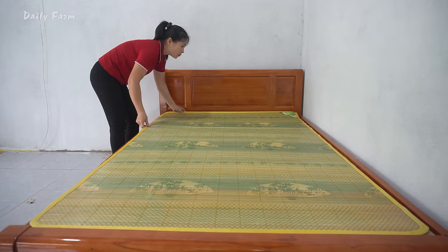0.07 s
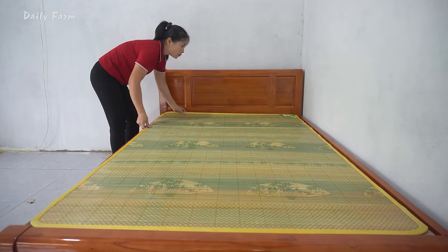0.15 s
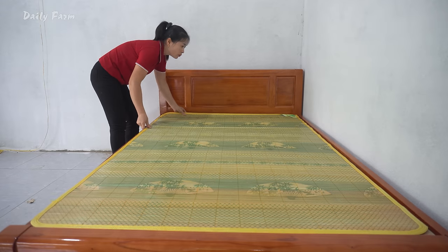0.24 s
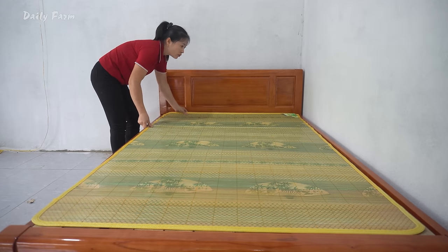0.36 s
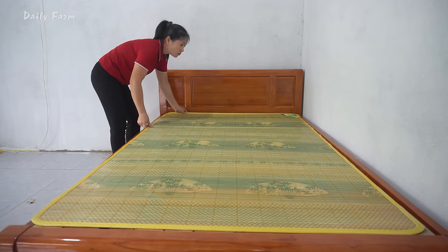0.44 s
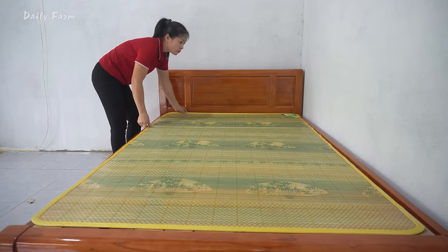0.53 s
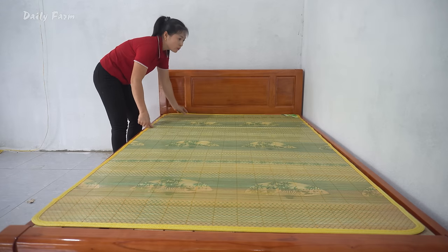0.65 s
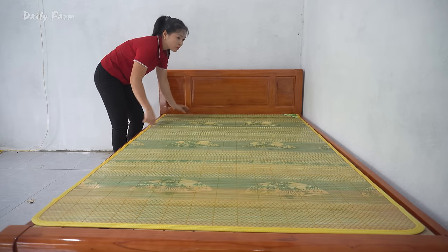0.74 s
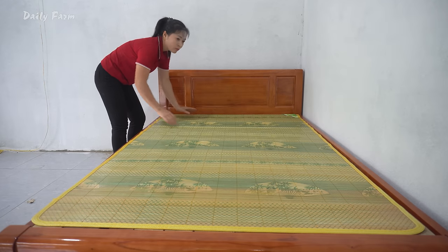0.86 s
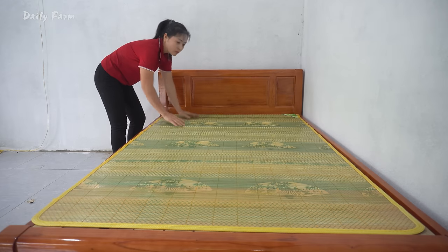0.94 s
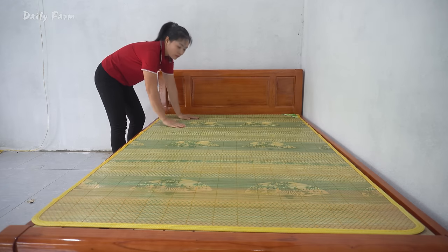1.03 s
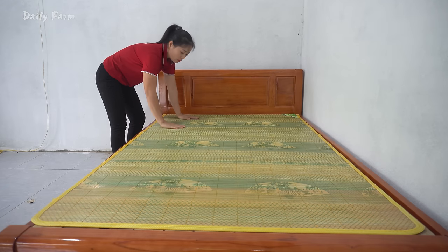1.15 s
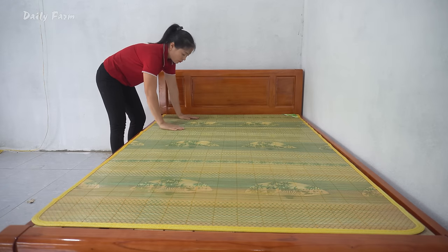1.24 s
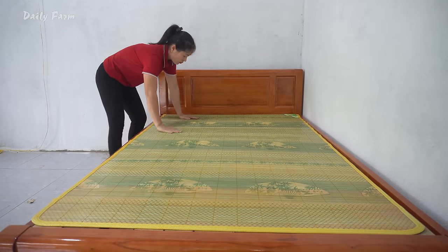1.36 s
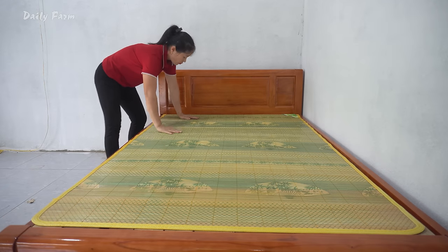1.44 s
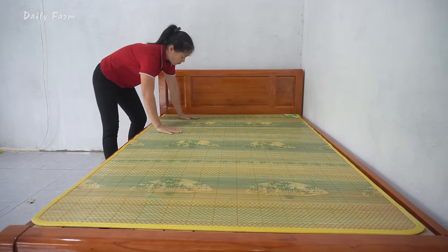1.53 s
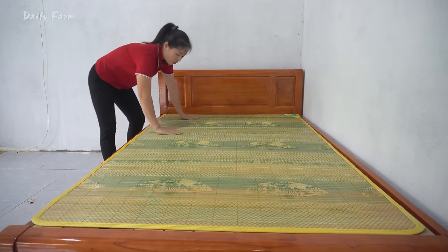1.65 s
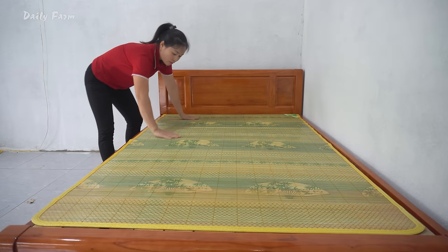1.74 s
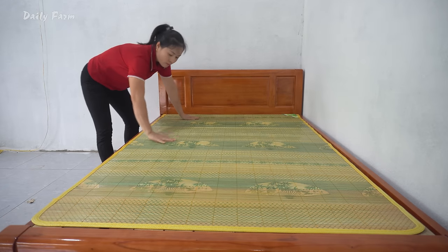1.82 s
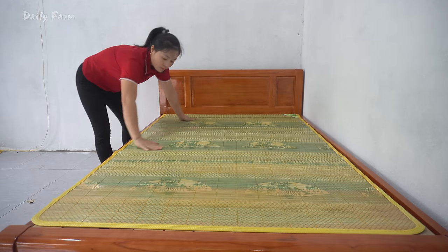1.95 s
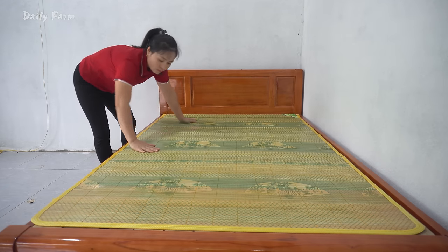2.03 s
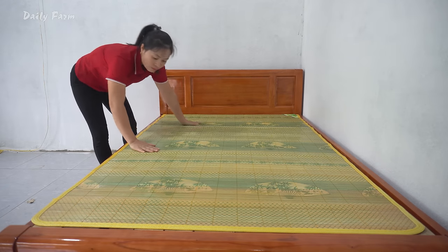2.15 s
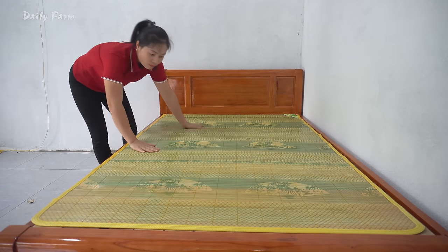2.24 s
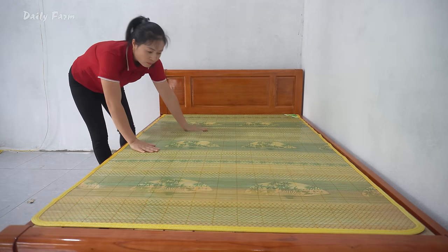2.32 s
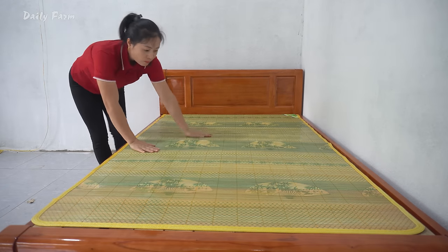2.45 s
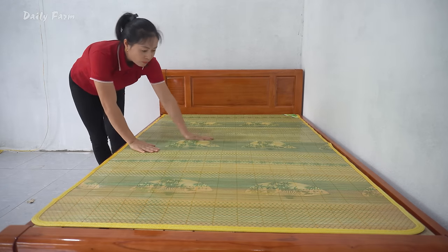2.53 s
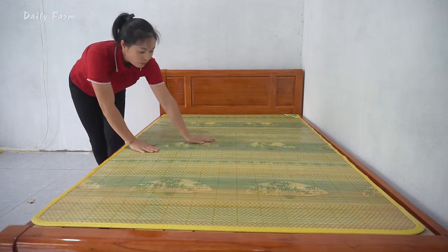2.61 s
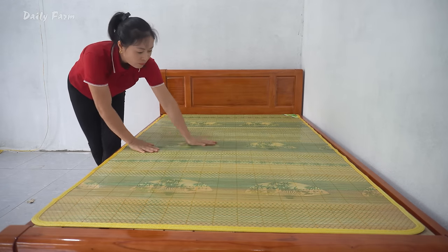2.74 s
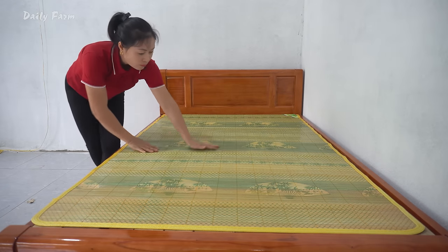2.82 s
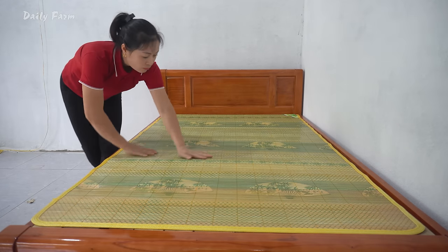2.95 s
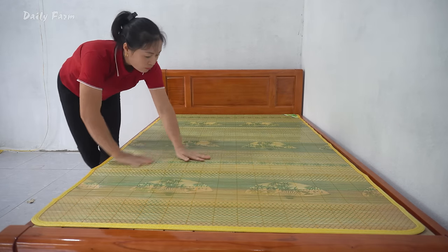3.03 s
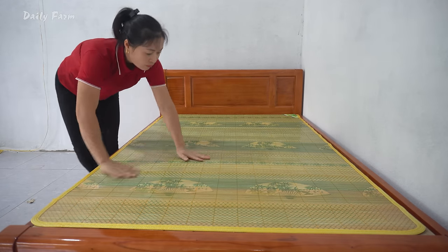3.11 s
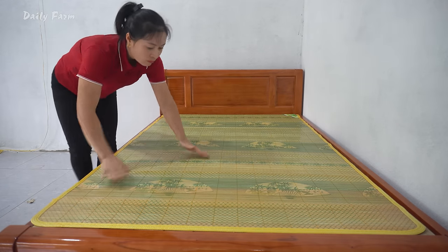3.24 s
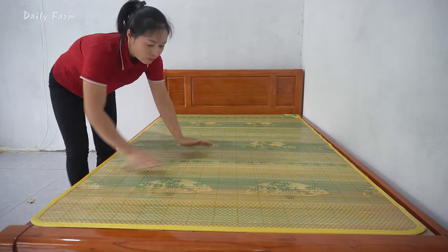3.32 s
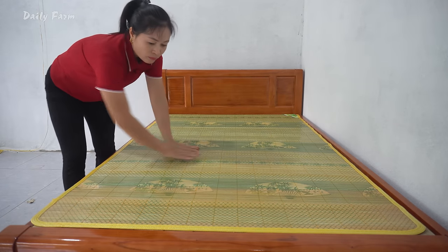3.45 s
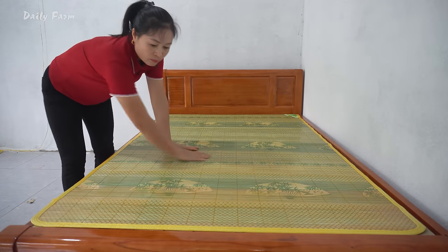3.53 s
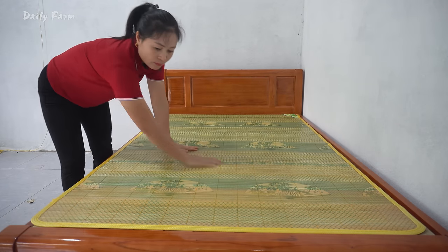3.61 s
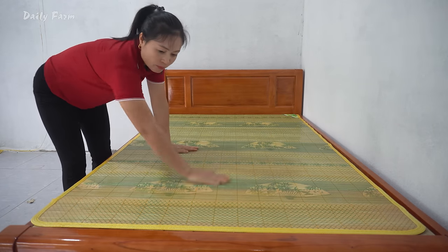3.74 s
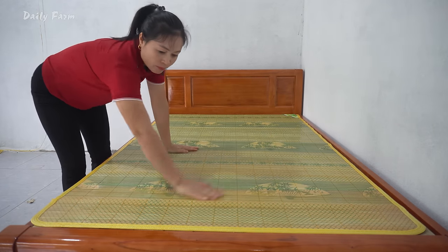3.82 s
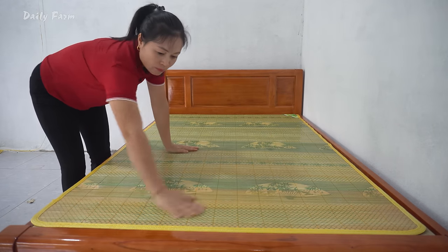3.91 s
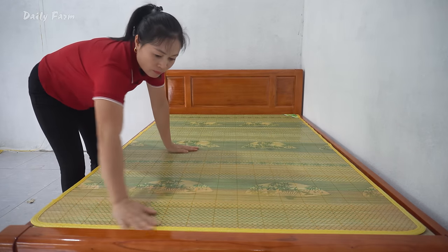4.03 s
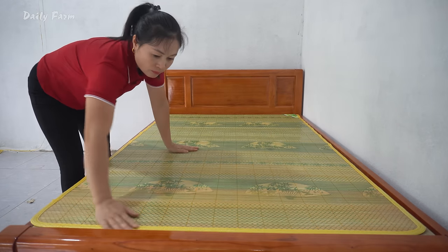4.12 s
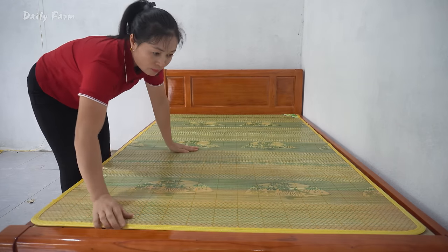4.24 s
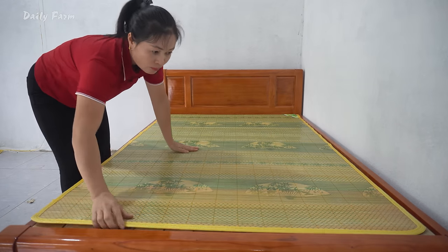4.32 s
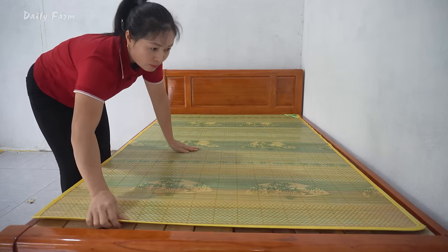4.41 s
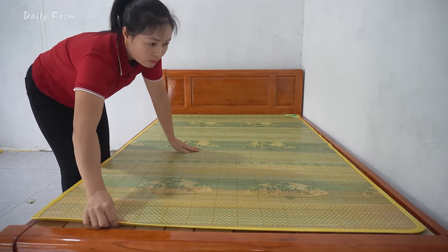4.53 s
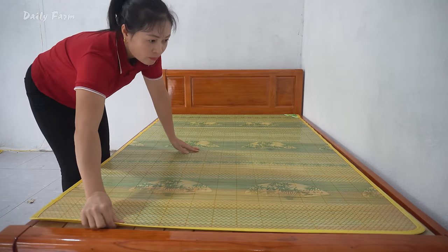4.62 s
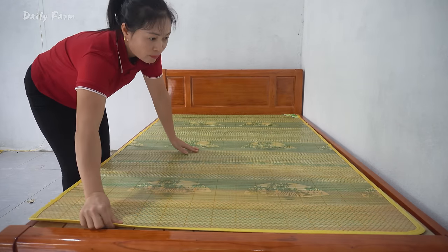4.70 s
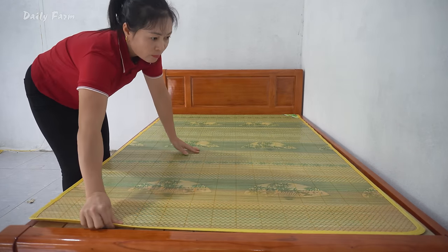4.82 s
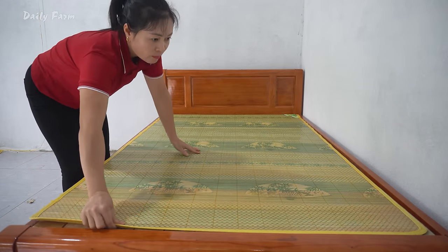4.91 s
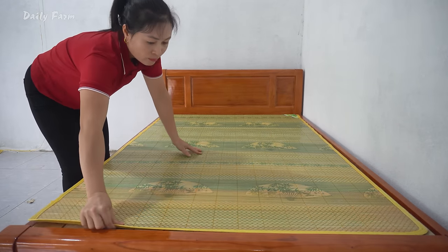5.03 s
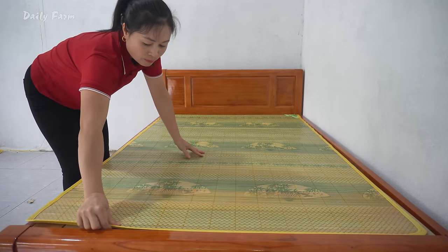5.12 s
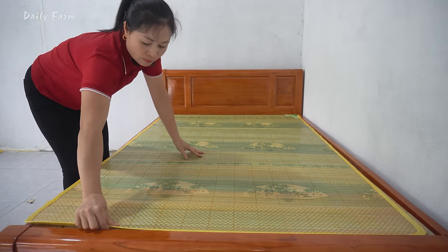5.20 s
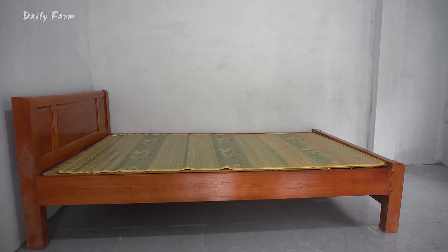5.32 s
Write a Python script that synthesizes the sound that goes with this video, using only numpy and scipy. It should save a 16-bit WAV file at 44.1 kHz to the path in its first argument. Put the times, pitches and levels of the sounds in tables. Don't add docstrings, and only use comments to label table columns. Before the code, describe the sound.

Close stereo sound of palms on a stiff woven mat over bed boards. It opens with sharp slat knocks and rattling strips, thins out, then becomes continuous hissing and rasping strokes, with muffled wooden bumps and small fibre clicks. The strongest sweep comes just before four seconds; the end is quiet handling with faint ticks, in a bare room with soft air murmur.

```python
import sys
import numpy as np
from scipy import signal
from scipy.fft import rfft, irfft, next_fast_len
from scipy.io import wavfile

SR = 44100
rng = np.random.default_rng(int(sys.argv[2]) if len(sys.argv) > 2 else 0)


def digitize_waveform(pressure):
    field = np.atleast_2d(pressure).T
    bounded = np.clip(field, -1, 1)
    quanta = np.round(bounded * 32767).astype(np.int16)
    wavfile.write(sys.argv[1], SR, quanta)


def amplitude_ratio(level_db):
    exponent = np.asarray(level_db, float) / 20
    return 10 ** exponent


N = 236596

# start_s, speed_up_s, slow_down_s, hiss_db, tips_db
GLIDES = [(.0, .05, 0.14, -48, -12), (.45, 0.089, 0.25, -44, -24), (.74, 0.11, 0.087, -53, -4),
          (1.55, .1, 0.18, -55.5, -16), (1.41, 0.29, 0.18, -40, 0.5), (1.9, 0.28, 0.36, -36.5, 0.5),
          (2.07, 0.24, 0.15, -40.5, 11), (2.4, 0.41, 0.27, -36.5, 0.5), (2.63, 0.33, 0.12, -38, 4),
          (3.0, 0.43, 0.43, -37.5, 1), (3.2, 0.23, 0.17, -33, 5.5), (3.3, .1, 0.18, -45, -6),
          (3.58, 0.071, 0.088, -62, 24), (3.8, .2, .3, -31.5, 0.5), (3.92, 0.1, 0.34, -32.5, 4.5),
          (4.1, 0.31, 0.27, -40.5, 2.5), (4.47, 0.041, 0.14, -51, 2), (4.65, .4, 0.72, -54.5, -2),
          (4.985, 0.051, 0.17, -50.5, 2), (5.2, 0.14, 0.22, -45.5, 1), (5.28, 0.11, 0.14, -53, -10)]
# start_s, rasp_db, fade_60db_s, skin_db, board_db
LANDINGS = [(0.058, -38.5, 1.5, -41, -53), (.309, -45.5, 0.91, -49, -52.5),
            (0.364, -32.5, 0.76, -32.5, -46), (.379, -30, 0.93, -30.5, -42),
            (0.777, -39.5, 0.71, -58, -38.5), (1.051, -41.5, 0.85, -71, -38.5), (2.417, -39, 1.6, -44, -41),
            (2.835, -41.5, 2.2, -58, -43.5), (3.51, -52, 0.74, -56, -48.5), (3.586, -49.5, 0.76, -66, -45),
            (4.955, -51.5, 2.2, -63, -60)]
# start_s, press_s, release_s, rasp_db, board_db
LEANS = [(.0, .05, 0.088, -45.5, -49), (.23, .15, 0.058, -49, -46.5), (.44, .1, 0.18, -41, -39),
         (.7, .15, .12, -50.5, -49), (.765, 0.047, 0.045, -55, -49), (1.415, 0.28, 0.18, -45.5, -49),
         (1.9, 0.21, 0.26, -41, -44.5), (2.07, 0.24, 0.13, -38, -42), (2.27, 0.33, 0.3, -43.5, -46),
         (2.52, 0.063, 0.16, -48, -44.5), (2.63, .15, 0.36, -42.5, -63), (3.0, 0.24, 0.18, -42, -43),
         (3.15, 0.13, 0.17, -41, -41.5), (3.24, 0.15, 0.17, -48, -39.5), (3.79, 0.088, 0.42, -38.5, -38),
         (4.03, 0.31, .12, -57, -48), (4.2, 0.068, 0.3, -47, -62), (4.34, 0.27, 0.15, -47, -54.5),
         (4.79, 0.14, 0.2, -51.5, -58.5), (5.04, 0.11, 0.15, -47.5, -53.5), (5.24, 0.14, 0.18, -42.5, -45)]
# pitch_hz, level_db
SKIN_COLOUR = [(2500, -14), (5000, -6), (7400, -4), (10000, -2), (13500, 0.5), (15000, -1.5), (16500, -6.5)]
# pitch_hz, level_db
SLAT_COLOUR = [(400, -15.5), (800, -7.5), (1300, -5.5), (2100, 2), (2900, -1), (4300, -2.5), (6500, -10),
               (11000, -19)]
# pitch_hz, width_hz, level_db
BOARD_MODES = [(192, 57, 0), (220, 28, 4), (250, 27, -0.5), (308, 45, -2.5), (363.3, 17.2, 0),
               (420, 32, -4), (517, 79, -5.5), (700, 160, -12)]
# pitch_hz, width_hz, level_db
FRAME_MODES = [(50.6, 15, -0.5), (77, 16.5, 5), (99, 33, -0.5)]
# start_s, fade_60db_s, pitch_hz, width_hz, peak_db
RUSTLES = [(.001, 0.62, 4100, 700, -52.5), (.004, 0.34, 799.2, 292, -49), (.062, 0.63, 4150, 833.3, -42),
           (.066, 0.48, 597, 300, -45), (0.317, 0.32, 5660, 1500, -48), (.372, 0.48, 2120, 250, -40.5),
           (.376, 0.51, 1080, 298, -37), (.44, 0.19, 3500, 4020, -35), (0.668, 0.26, 3920, 594, -48),
           (1.062, 0.74, 916.7, 648, -42), (3.188, 0.52, 396, 140, -42), (4.29, .6, 1500, 700, -49.5),
           (4.445, 0.32, 14200, 2500, -46), (5.17, 0.58, 2140, 700, -45)]
# pitch_hz, level_db
AIR_COLOUR = [(24, -30), (40, 5.5), (190, 2.5), (831, -4), (2050, -4), (6820, -15.5), (13100, -24.5),
              (16000, -31)]
# pitch_hz, fade_60db_s
ROOM_FADE = [(100, 1), (500, 0.5), (2000, 0.58), (6000, 0.45), (14000, 0.22)]
# start_s, slat_peak_db, slat_pitch_hz, ring_s, tick_db
PATS = [(0.0612, -14.5, 1800, 0.00079, -33), (.063, -17, 1300, .0008, -25), (0.312, -33, 2000, .001, -41),
        (.3662, -16.5, 2180, 0.0031, -22), (0.3813, -15, 2150, 0.0027, -42),
        (0.382, -26, 2240, 0.0023, -31), (0.7778, -15, 2460, 0.0017, -48), (1.054, -24, 2240, 0.0027, -52),
        (1.056, -30.5, 2830, 0.0029, -56), (2.837, -21, 2300, 0.00087, -22.5),
        (4.6008, -48, 2350, 0.0008, -31), (4.9571, -48, 2300, .001, -42), (4.9775, -44, 2500, .001, -40)]
# start_s, peak_db, pitch_hz, ring_s
SNAPS = [(0.0618, -22, 6900, 0.00015), (0.0634, -27, 9100, 0.00019), (.3126, -45, 11500, 0.00056),
         (.3807, -14, 5060, 0.00015), (0.385, -19, 3200, 0.00094), (0.395, -19, 4000, 0.00018),
         (.4412, -20, 12500, .0006), (.79, -30, 5200, 0.00033), (2.431, -23.5, 2280, .0006),
         (2.512, -28, 2000, 0.0019), (4.601, -35, 13000, .001), (4.9645, -38, 14500, .0007),
         (4.9762, -37, 15000, .0007)]
# start_s, swell_s, first_pitch_hz, last_pitch_hz, peak_db
HUMS = [(.42, 0.073, 238, 244.6, -35.5), (.43, 0.048, 201.9, 192, -43), (.73, 0.045, 289, 287, -45.5),
        (.80, 0.045, 190.2, 202, -44.5), (1.055, 0.009, 85.8, 72.4, -44),
        (1.058, 0.015, 250.5, 257.7, -34.5), (1.08, 0.02, 209, 200, -50), (1.80, 0.064, 85.9, 79.5, -44.5),
        (1.93, 0.041, 196, 168.3, -42.5), (2.03, 0.033, 280, 302, -53), (2.25, 0.024, 250, 250, -51.5),
        (2.42, 0.042, 80, 89.4, -53), (2.46, 0.033, 187.5, 195, -45.5), (2.85, 0.02, 420, 420, -46),
        (3.01, 0.052, 252.7, 274.4, -40), (3.02, 0.053, 208.7, 237, -42.5), (3.18, 0.046, 88.2, 84, -44),
        (3.19, 0.033, 225.2, 228.3, -41), (3.585, 0.013, 93.4, 87, -39), (3.72, 0.037, 134, 151, -47),
        (3.76, 0.054, 155, 199, -41.5), (3.84, 0.042, 236.2, 220, -42), (4.29, 0.046, 367, 363, -55.5),
        (5.19, 0.038, 193.3, 213, -49)]
# pitch_hz, level_db
MAT_WIDTH = [(50, -30), (125, -28), (250, -22), (500, -14.5), (1000, -11), (2000, -8), (4000, -2.5),
             (8000, -.5), (13000, -4)]
# pitch_hz, level_db
AIR_WIDTH = [(60, -14.5), (300, -2), (1000, 2), (2500, -4), (8000, -2)]
# pitch_hz, level_db
PORT_DIFFERENCE = [(300, -0.5), (1500, -0.8), (4000, -0.1), (8000, 0.4), (12000, -0.8), (16000, -2)]


def rms_one(x):
    return x / np.sqrt(np.mean(x ** 2) + 1e-20)


def at_hz(points, hz):
    table_hz, values = np.array(points).T
    return np.interp(np.log(hz + 1), np.log(table_hz), values)


def coloured(x, points):
    size = next_fast_len(N)
    gain = amplitude_ratio(at_hz(points, np.fft.rfftfreq(size, 1 / SR)))
    return irfft(rfft(x, size) * gain, size)[..., :N]


def tilted(x, pivot_hz, tilt_db):
    low = signal.sosfiltfilt(signal.butter(2, pivot_hz, fs=SR, output="sos"), x)
    return low * amplitude_ratio(-tilt_db / 2) + (x - low) * amplitude_ratio(tilt_db / 2)


def drift(rate_hz):
    r = np.exp(-80 * np.pi * rate_hz / SR)
    slow = signal.lfilter([1], [1, -2 * r, r * r], rng.standard_normal(N // 40 + 2002))
    slow = slow[2000:]
    return np.interp(np.arange(N) / 40, np.arange(len(slow)), rms_one(slow))


def resonate(x, modes):
    out = 0
    for k, (hz, width_hz, db) in enumerate(modes):
        r = np.exp(-np.pi * width_hz / SR)
        poles = [1, -2 * r * np.cos(2 * np.pi * hz / SR), r * r]
        out = out + (-1) ** k * amplitude_ratio(db) * signal.lfilter([1 - r * r, 0, r * r - 1], poles, x)
    return out


def slips(per_s, spread_db, bunch_db):
    sizes = amplitude_ratio(spread_db * np.minimum(rng.exponential(1, (2, N)), 5))
    signs = rng.choice([-1, 1], (2, N))
    born = rng.random((2, N)) < per_s / SR
    return sizes * signs * born * amplitude_ratio(bunch_db * drift(19.5))


def swell(s, swell_s, t60):
    t = np.clip(np.arange(N) / SR - s, 0, None)
    rise = np.sin(np.pi / 2 * np.minimum(t / swell_s, 1)) ** 2
    return t, rise * amplitude_ratio(-60 * np.maximum(t - swell_s, 0) / t60)


def motion(s, rise_s, fall_s):
    drop_db, bluntness = 19.5, 1.84
    t = np.arange(0, N + 32, 32) / SR - s
    share = np.where(t < 0, t / max(rise_s, .01), t / max(fall_s, .01))
    loss = np.abs(share) ** bluntness
    return np.interp(np.arange(N) / 32, np.arange(len(t)), amplitude_ratio(-drop_db * np.minimum(loss, 6)))


def hands():
    skin, slats, board = (np.full(N, amplitude_ratio(2 * rest_db)) for rest_db in (-73.5, -61.5, -65.5))
    tips = np.zeros(N)
    for s, rise_s, fall_s, hiss_db, tips_db in GLIDES:
        power = (amplitude_ratio(hiss_db) * motion(s, rise_s, fall_s)) ** 2
        skin = skin + power
        tips = tips + tips_db * power
        slats = slats + power * amplitude_ratio(-2 * 6)

    touch_s, board_touch_s = 0.0056, 0.015
    for s, rasp_db, t60, skin_db, board_db in LANDINGS:
        skin = skin + (amplitude_ratio(skin_db) * swell(s, touch_s, t60 * 0.64)[1]) ** 2
        slats = slats + (amplitude_ratio(rasp_db) * swell(s, touch_s, t60)[1]) ** 2
        board = board + (amplitude_ratio(board_db) * swell(s, board_touch_s, t60)[1]) ** 2

    for s, press_s, release_s, rasp_db, board_db in LEANS:
        power = motion(s, press_s, release_s) ** 2
        slats = slats + power * amplitude_ratio(2 * rasp_db)
        board = board + power * amplitude_ratio(2 * board_db)

    skin_db, slat_db, board_db = 10 * np.log10([skin, slats, board])
    stiff_db = np.clip(-3 + 0.8 * (skin_db - slat_db), -10.5, 10.5)
    return skin_db, slat_db, board_db, tips / skin, stiff_db


def sweeping():
    hiss_db, rasp_db, board_db, tips_db, stiff_db = hands()
    frame_db = -55 + 1.25 * (board_db + 44) + 3.5 * drift(10)

    hiss = rms_one(coloured(slips(16000, spread_db=2.5, bunch_db=0.1), SKIN_COLOUR))
    hiss = amplitude_ratio(hiss_db) * tilted(hiss, 8000, tips_db)

    rasp = rms_one(coloured(slips(7000, spread_db=1.5, bunch_db=0.44), SLAT_COLOUR))
    rasp = amplitude_ratio(rasp_db) * tilted(rasp, 1560, stiff_db)

    boards = rms_one(resonate(slips(2000, spread_db=2.0, bunch_db=1.85), BOARD_MODES))
    boards = amplitude_ratio(board_db - 2.0) * boards

    frame = rms_one(resonate(slips(900, spread_db=2.0, bunch_db=-0.6), FRAME_MODES))
    return hiss + rasp + boards + amplitude_ratio(frame_db) * frame


def background_murmur():
    return amplitude_ratio(-57) * rms_one(coloured(rng.standard_normal((2, N)), AIR_COLOUR))


def rustles():
    out = np.zeros((2, N))
    source = slips(5000, spread_db=3.0, bunch_db=1.0)
    for s, t60, hz, width_hz, peak_db in RUSTLES:
        strip = [(hz, width_hz, 0)]
        ringing = rms_one(resonate(resonate(source, strip), strip))
        level = swell(s, 0.0086, t60)[1]
        out += amplitude_ratio(peak_db) * level * ringing
    return out


def room(x):
    t = np.arange(SR) / SR
    edges = np.geomspace(40, 18000, 9)
    white, tail = rng.standard_normal((2, SR)), 0
    for low, high in zip(edges, edges[1:]):
        band = signal.sosfilt(signal.butter(2, [low, high], "band", fs=SR, output="sos"), white)
        t60 = np.clip(at_hz(ROOM_FADE, np.sqrt(low * high)), .1, 3)
        tail = tail + band * amplitude_ratio(-60 * t / t60)
    tail = tail * np.clip((t - .006) / 0.0093, 0, 1)
    tail = tail / np.sqrt(np.sum(tail ** 2) / 2)
    return signal.fftconvolve(x[None], tail, axes=1)[:, :N]


def pats():
    out, t = np.zeros(N), np.arange(1300) / SR
    noise = rng.standard_normal((len(PATS), 2, len(t)))
    treble = signal.butter(4, 10500, "high", fs=SR, output="sos")
    rise = 1 - np.exp(-t / .0006)
    for (s, slat_db, hz, ring_s, tick_db), (slat_noise, tick_noise) in zip(PATS, noise):
        ring_s = max(ring_s, .0004)
        clatter = np.clip(0.00047 / ring_s, 0, 1)
        rough = rms_one(resonate(slat_noise, [(hz, 1200, 0)]))
        tone = np.sin(2 * np.pi * hz * t)
        slat = ((1 - clatter) * tone + clatter * rough) * np.exp(-t / ring_s)
        tick = signal.sosfilt(treble, tick_noise) * np.exp(-t / 0.0014)
        at = round(s * SR)
        out[at:at + len(t)] += rise * (amplitude_ratio(slat_db - 4.0) * slat + amplitude_ratio(tick_db + 2) * tick)
    return out


def snaps():
    out, t = np.zeros(N), np.arange(300) / SR
    for s, peak_db, hz, ring_s in SNAPS:
        click = np.sin(2 * np.pi * hz * t) * np.exp(-t / max(ring_s, .0001))
        at = round(s * SR)
        out[at:at + len(t)] += amplitude_ratio(peak_db + 1.5) * click
    return out


def hums():
    out = np.zeros(N)
    for s, swell_s, first_hz, last_hz, peak_db in HUMS:
        t, level = swell(s, swell_s, 0.2 + 6.4 * swell_s)
        hz = last_hz + (first_hz - last_hz) * np.exp(-t / swell_s / 2.03)
        out += amplitude_ratio(peak_db) * level * np.sin(2 * np.pi * np.cumsum(hz) / SR)
    return out * amplitude_ratio(3.95 * drift(15))


def left_right(front_side, width):
    front = front_side[0]
    side = coloured(front_side[1], width)
    return np.array([front + side, front - side])


def scene():
    sweep = sweeping()
    air = background_murmur()
    rustle = rustles()
    hits = pats() + snaps()
    hum = hums()
    echoes = amplitude_ratio(-15) * room(sweep[0]) + amplitude_ratio(-12) * room(hits) + amplitude_ratio(-10.5) * room(hum)
    wide = left_right(sweep + rustle + echoes, MAT_WIDTH)
    return wide + left_right(air, AIR_WIDTH) + hits + hum


def top_cut(x):
    return signal.sosfilt(signal.butter(12, 15920, fs=SR, output="sos"), x)


def record(dry):
    size = next_fast_len(N)
    hz = np.fft.rfftfreq(size, 1 / SR)
    ports = amplitude_ratio(at_hz(PORT_DIFFERENCE, hz) * np.array([[.5], [-.5]]))
    ports = ports * (hz < 15920)
    ports = ports * hz ** 2 / (hz ** 2 + 35 ** 2)
    mix = irfft(rfft(dry, size) * ports, size)[:, :N]
    return top_cut(mix)


dry = scene()
out = record(dry)
digitize_waveform(out)
```